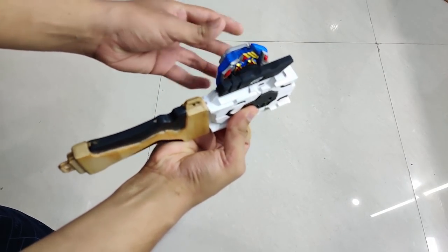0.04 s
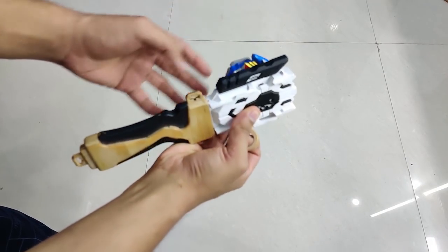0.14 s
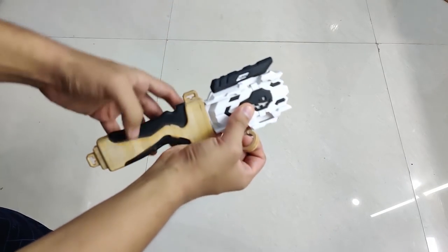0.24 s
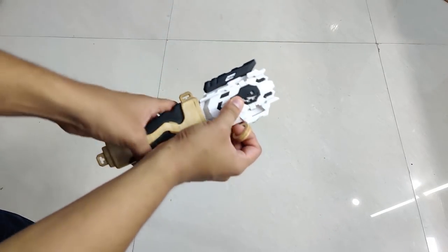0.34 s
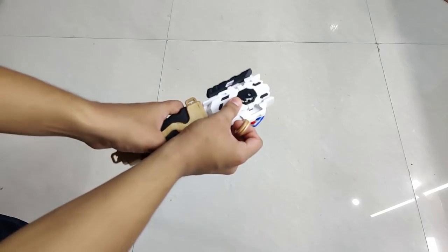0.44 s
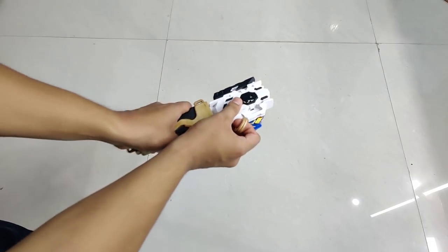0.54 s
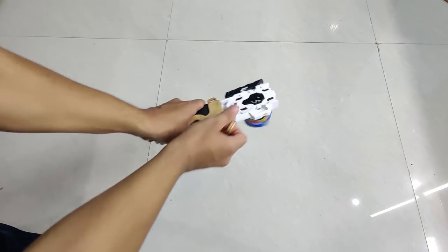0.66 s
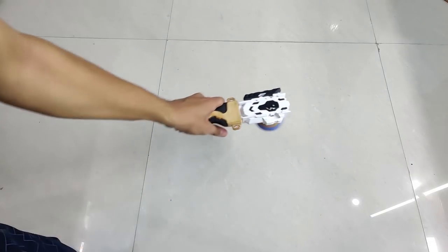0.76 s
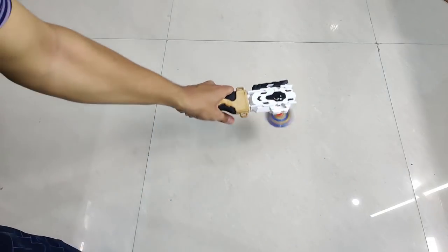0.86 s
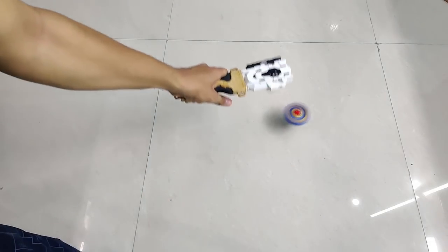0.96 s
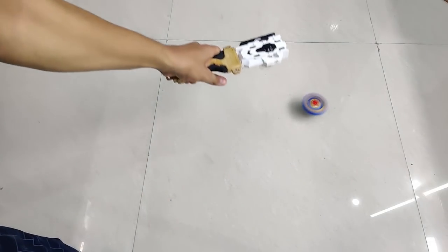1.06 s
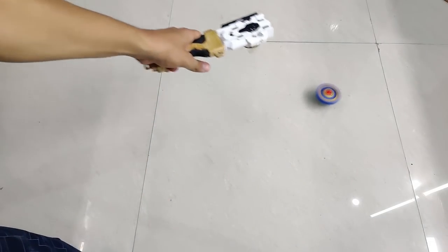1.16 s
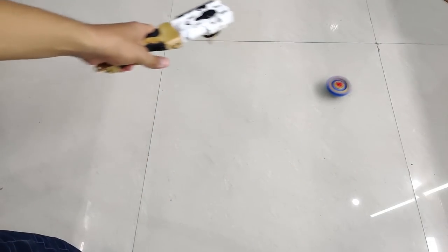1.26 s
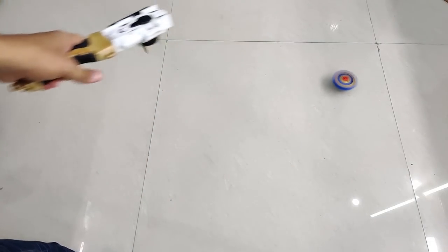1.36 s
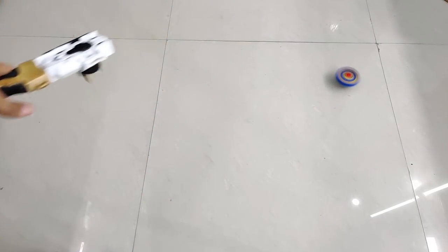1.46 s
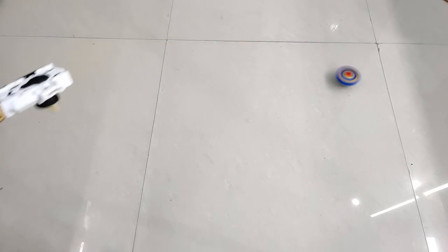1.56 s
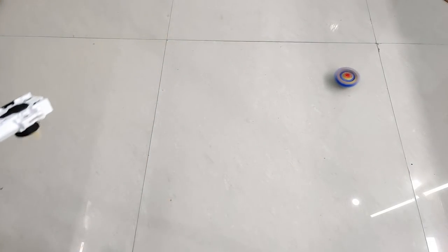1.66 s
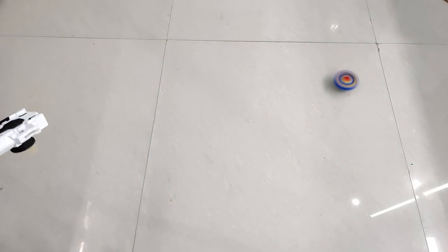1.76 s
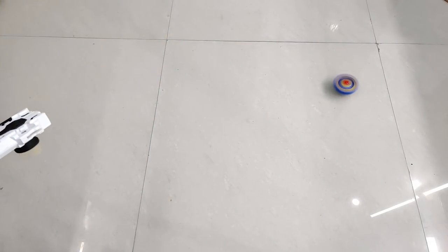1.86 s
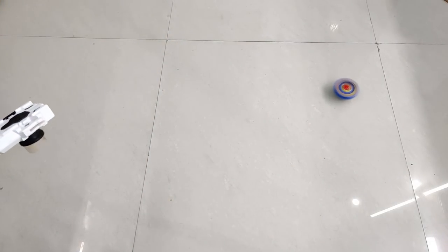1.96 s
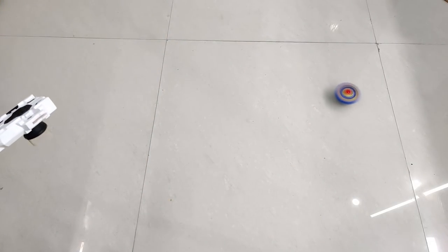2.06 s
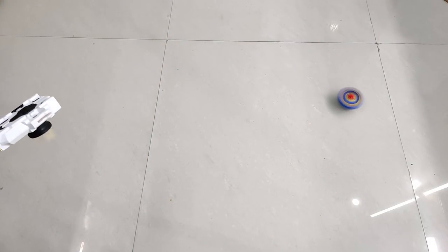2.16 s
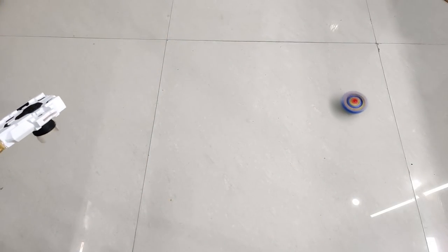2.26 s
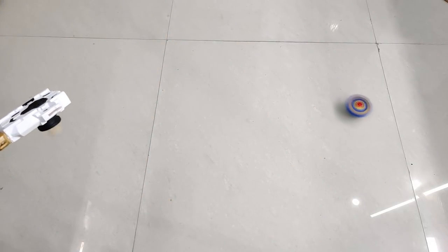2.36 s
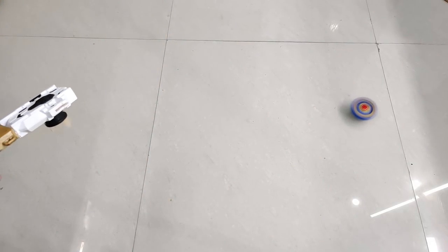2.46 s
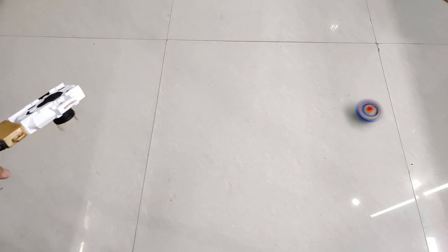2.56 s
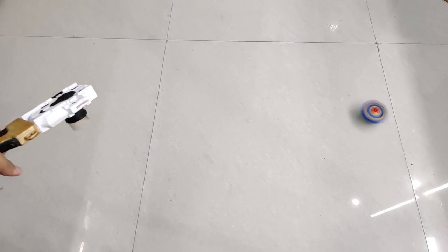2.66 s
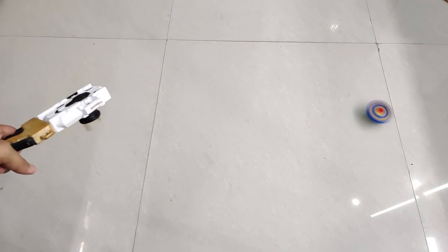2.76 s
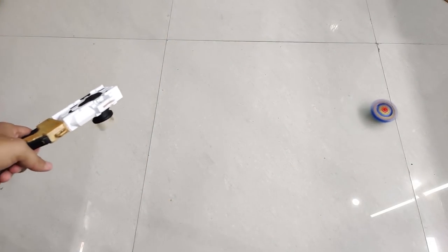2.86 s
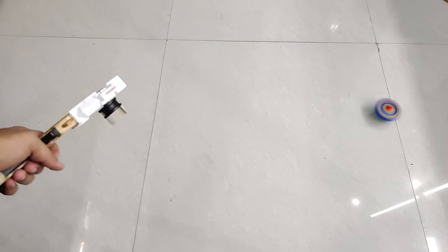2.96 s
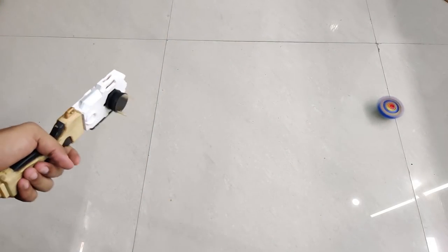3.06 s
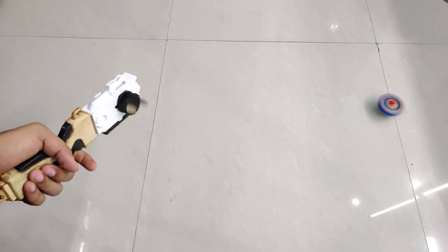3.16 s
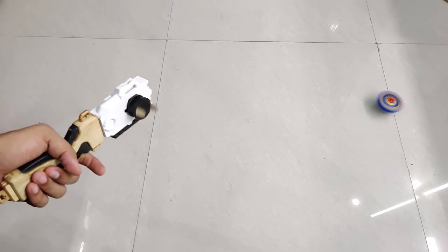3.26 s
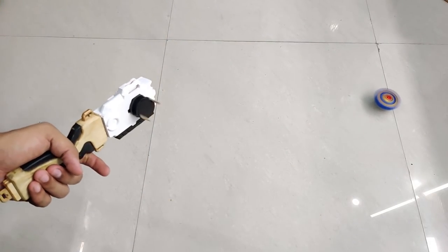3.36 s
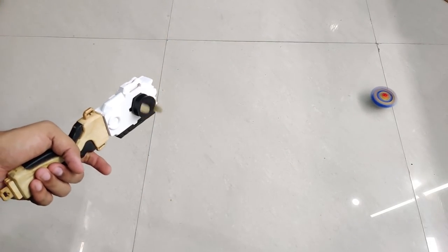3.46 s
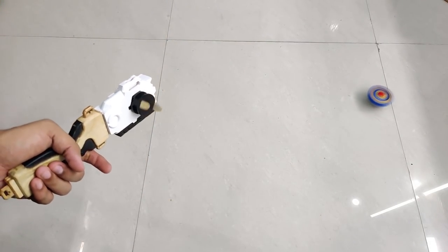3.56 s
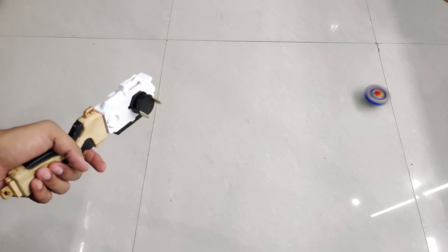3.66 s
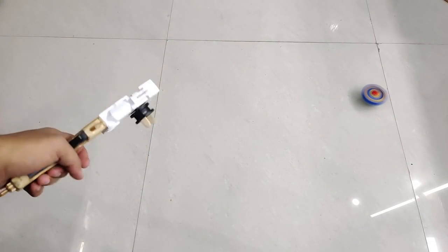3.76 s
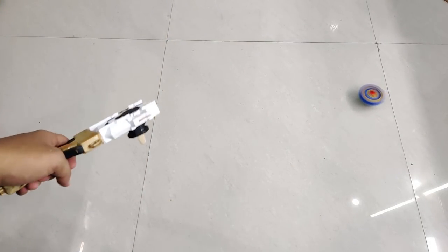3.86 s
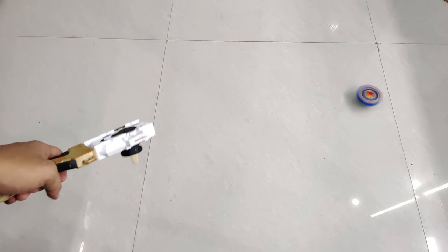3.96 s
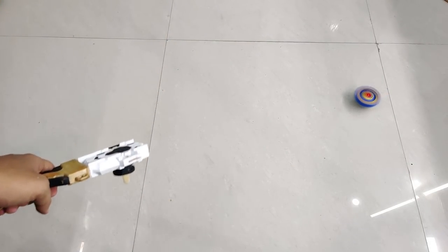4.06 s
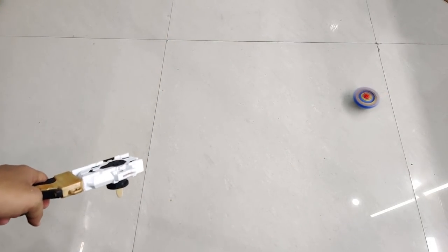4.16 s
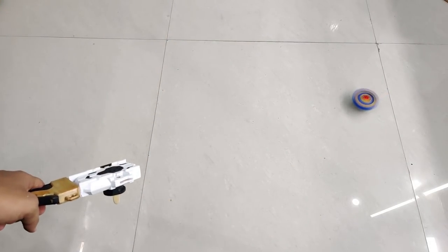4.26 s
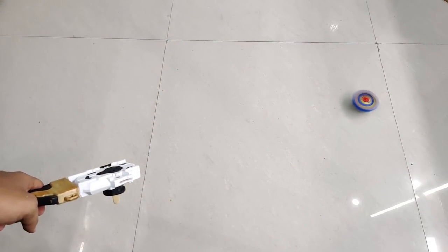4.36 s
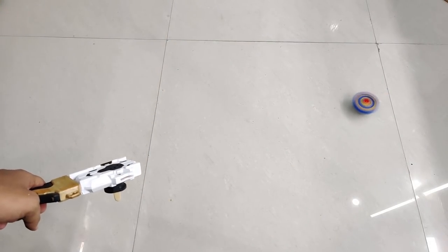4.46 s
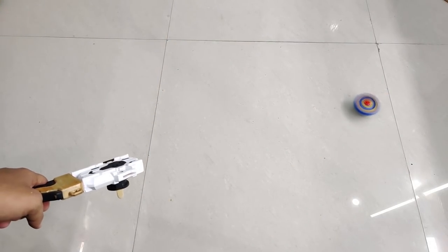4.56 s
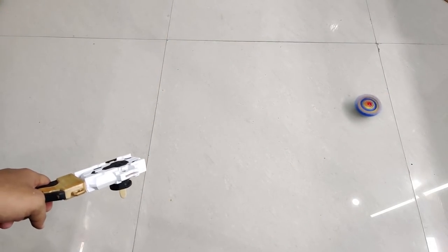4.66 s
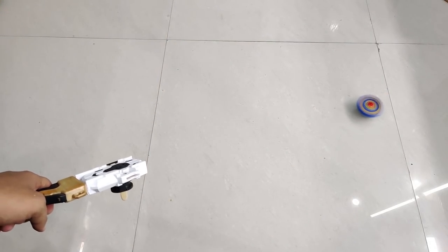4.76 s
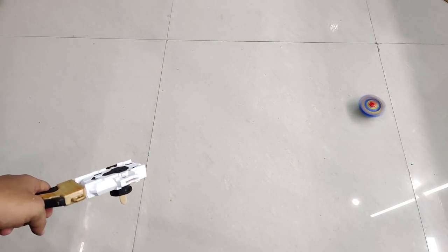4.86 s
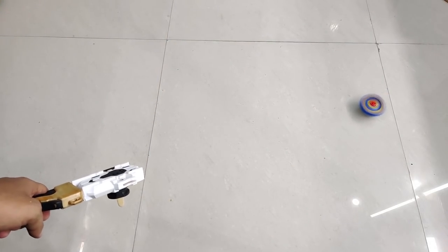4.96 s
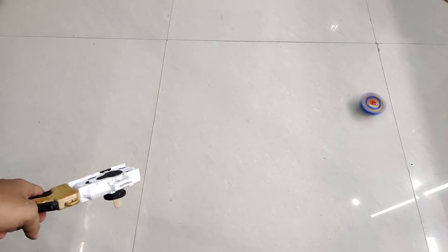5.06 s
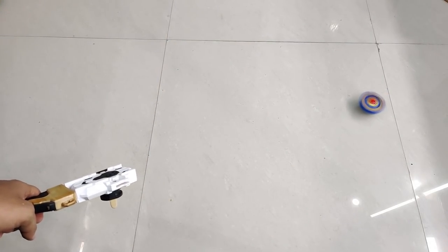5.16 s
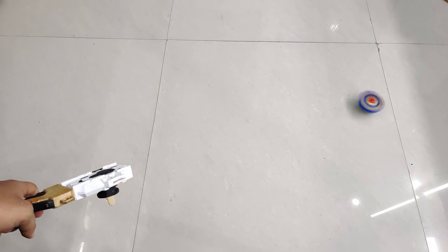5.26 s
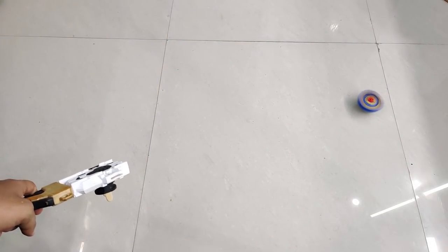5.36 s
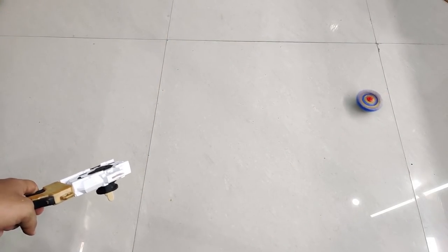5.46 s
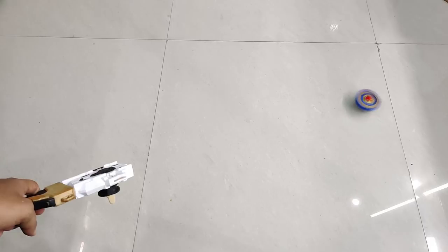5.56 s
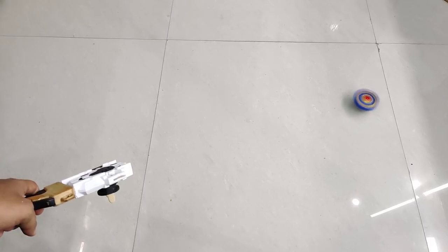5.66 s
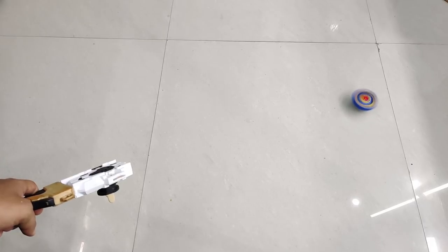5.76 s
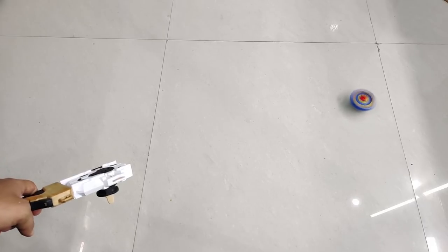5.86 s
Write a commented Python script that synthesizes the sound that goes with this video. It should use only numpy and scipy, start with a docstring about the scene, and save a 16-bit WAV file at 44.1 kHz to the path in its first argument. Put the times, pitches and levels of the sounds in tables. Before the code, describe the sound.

Over a low machine hum, a toothed ripping zip launches a spinning top that strikes hard tile, skips, scrapes brightly and quietens.

```python
"""A machine hums in a hard room; fingers rub and squeak on a hand launcher, then a toy top is ripped off it.
Toothed gears whirr ever faster, each tooth a snap of noise; the top cracks down on a tile floor, skips and whirrs.
Its tip scrapes the tile, hardest once a turn, and the friction noise excites the modes of its body.
The launcher gives tiny bright ticks, short bursts of noise, and a limiter ducks everything for a moment
at the landing."""
import sys
import numpy as np
from scipy import signal
from scipy.fft import rfft, irfft, next_fast_len
from scipy.io import wavfile
from scipy.ndimage import uniform_filter1d, minimum_filter1d, map_coordinates

SR = 44100
rng = np.random.default_rng(int(sys.argv[2]) if len(sys.argv) > 2 else 0)


def unload_wav(signal):
    """Save mono or channel-first audio to the path in sys.argv[1] as 16-bit WAV at rate SR, clipped to [-1, 1]."""
    wavfile.write(
        sys.argv[1],
        SR,
        np.round(np.clip(np.atleast_2d(signal).T, -1, 1) * 32767).astype(np.int16),
    )


N = 260631
T = np.arange(N) / SR  # time [s]


def amp(db):
    """Level to gain: 20 dB is a factor of ten in amplitude."""
    return 10 ** (np.asarray(db) / 20)


def unit(x):
    """Normalisation of x to an rms value of 1."""
    return x / np.sqrt(np.mean(x ** 2) + 1e-20)


def along(points, hz):
    """Interpolation of (frequency [Hz], value) points on a logarithmic frequency axis."""
    f, values = np.transpose(points)
    return np.interp(np.log(hz + 1), np.log(f + 1), values)


def curves(rows):
    """Piecewise linear interpolation in time: one curve for each column after the time."""
    seconds, *columns = np.transpose(rows)
    return [np.interp(T, seconds, column) for column in columns]


def wobble(rate):
    """Band-limited random fluctuation: a smooth curve through `rate` random knots a second."""
    knots = rng.standard_normal(int(N * rate / SR) + 4)
    return map_coordinates(knots, [T * rate])


def since(s):
    """Elapsed time [s] since s, 0 before."""
    return np.maximum(T - s, 0)


def gate(start, length, attack, release):
    """Trapezoidal envelope: rises from start, holds until start + length, then falls (all in s)."""
    rise = np.clip((T - start) / attack, 0, 1)
    fall = np.clip(1 - (T - start - length) / release, 0, 1)
    return rise * fall


def filtered(x, response):
    """Linear filtering as multiplication by a complex frequency response."""
    m = next_fast_len(N + SR // 2)
    return irfft(rfft(x, m) * response(np.fft.rfftfreq(m, 1 / SR)), m)[..., :N]


def coloured(x, spectrum):
    """Minimum-phase filtering: the folded cepstrum gives a causal kernel, scaled to energy 1."""
    size = 4096
    log_magnitude = np.log(amp(along(spectrum, np.fft.rfftfreq(size, 1 / SR))) + 1e-6)
    cepstrum = irfft(log_magnitude)
    cepstrum[1:size // 2] *= 2
    cepstrum[size // 2 + 1:] = 0
    kernel = irfft(np.exp(rfft(cepstrum)))
    return signal.fftconvolve(x, kernel / np.linalg.norm(kernel))[:len(x)]


def resonate(x, modes):
    """Modal superposition: parallel (frequency [Hz], width [Hz], gain [dB]) resonators of alternating sign."""
    def response(f):
        total = 0
        for k, (centre, width, db) in enumerate(modes):
            damping = 1j * f * width
            total = total + (-1) ** k * amp(db) * damping / (centre * centre - f * f + damping)
        return total
    return filtered(x, response)


def ringing(x, hz, width, db=0):
    """Resonance of one mode: two equal resonators in cascade give steep skirts; rms level db."""
    def response(f):
        damping = 1j * f * 1.5 * width  # widened, as the cascade narrows the peak
        return (damping / (hz * hz - f * f + damping)) ** 2
    return amp(db) * unit(filtered(x, response))


def burst(s, t60):
    """Impulsive excitation: noise of energy 1 that starts at s and decays exponentially by 60 dB in t60."""
    t = np.arange(SR // 20) / SR
    puff = rng.standard_normal(len(t)) * amp(-60 * t / t60)
    out = np.zeros(N + len(t))
    out[round(s * SR):][:len(t)] = puff / np.linalg.norm(puff)
    return out[:N]


def in_room(x, lead_ms, pan_db, wet_db):
    """Direct sound, with time and level differences between ears, plus a diffuse tail redrawn every 40 ms."""
    # reverberation time: (frequency [Hz], t60 [s])
    reverb_times = [(200, 0.21), (1500, 0.49), (5000, 0.68), (15000, 0.22)]
    hop, size = SR // 25, SR // 3
    hz, t, _ = signal.stft(np.zeros(size), SR, nperseg=256)
    build_up = 1 - np.exp(-t / 0.0029)
    decay = amp(-60 * t / along(reverb_times, hz)[:, None]) * build_up
    padded = np.pad(x, (hop, 2 * hop))
    fade = np.sin(np.pi * np.arange(2 * hop) / (2 * hop))
    wet = np.zeros((2, N + 2 * size))
    for start in range(0, N, hop):
        piece = padded[start:start + 2 * hop] * fade
        if np.abs(piece).max() > 1e-6:
            noise = signal.stft(rng.standard_normal((2, size)), nperseg=256)[2]
            tail = signal.istft(noise * decay, nperseg=256)[1]
            answer = signal.fftconvolve(piece[None], tail / np.linalg.norm(tail[0]), axes=1)
            wet[:, start:start + answer.shape[1]] += answer
    sides = np.array([[.5], [-.5]])  # left, right; a positive lead reaches the left first
    direct = filtered(x, lambda f: np.exp(2j * np.pi * f * sides * lead_ms / 1000))
    mixed = direct + amp(wet_db) * wet[:, hop:hop + N]
    return mixed * amp(sides * pan_db) / np.sqrt(1 + amp(2 * wet_db))


def room_tone():
    """Steady machine tones with slow phase wander, a rumble mostly coherent between ears, and diffuse air noise."""
    # weaker machine lines: (frequency [Hz], relative level [dB])
    motor_lines = [(48.4, -13), (57, -25), (96.9, -12.5), (145.3, -20.5)]
    # low machine noise: (frequency [Hz], relative spectral density [dB])
    rumble_spectrum = [(20, -18.5), (38, -13), (55, 4), (80, -2), (120, -11), (200, -10), (320, -11.5),
                       (600, -19.5), (1500, -47)]
    # faint hiss: (frequency [Hz], relative spectral density [dB])
    air_spectrum = [(240, -39), (400, -7), (777, -8.5), (1030, -14.5), (1230, -8.5), (1440, -18.5),
                    (1790, -16.5), (2050, -16), (3640, -14), (4440, -18.5), (5690, -23.5), (13900, -22.5),
                    (16000, -26.5)]
    # thin room tones: (frequency [Hz], width [Hz], relative gain [dB])
    thin_tones = [(1760, 45, -9), (3870, 45, 1), (4327, 120, -8)]
    # the hum swells for a while: (start [s], length [s], attack [s], release [s])
    hum_swell = (0.71, 2.34, 0.71, 0.71)
    hum_hz, slip_s = 199.5, 3.052

    def line(hz, phase):
        return np.sqrt(2) * np.sin(2 * np.pi * hz * T + phase)

    def noise(spectrum):
        return coloured(rng.standard_normal(N), spectrum)

    hum_db = -52.6 + 5 * gate(*hum_swell)
    slip = np.pi * np.clip((T - slip_s) / .012 + .5, 0, 1)  # the hum stumbles: half a cycle of phase in 12 ms
    hum = amp(0.1 * wobble(34)) * line(hum_hz, slip + 0.1 * wobble(2.5))
    motor = sum(amp(db - 1.5 + 1.2 * wobble(8.5)) * line(hz, 1.2 * wobble(9)) for hz, db in motor_lines)
    shared_rumble = amp(-8.5) * noise(rumble_spectrum)
    separate_rumble = amp(-19.5) * np.array([noise(rumble_spectrum), noise(rumble_spectrum)])
    machine = amp(hum_db) * (hum + motor + shared_rumble + separate_rumble)
    hiss = amp(-66.0) * np.array([noise(air_spectrum), noise(air_spectrum)])
    tones = amp(-71.5) * unit(resonate(rng.standard_normal((2, N)), thin_tones))
    return machine * amp([[1.8], [-2.2]]) + (hiss + tones) * amp([[1], [-1]])  # left, right


def fingers():
    """Sliding friction: skin makes fluctuating noise, louder as the grip tightens, and narrow-band squeaks."""
    # sliding skin: (frequency [Hz], relative spectral density [dB])
    skin_spectrum = [(180, -41.5), (300, 1), (398, -6), (537, 5.5), (1250, -3.5), (1430, -5.5),
                     (1580, -13.5), (2140, -12.5), (4750, -8.5), (5800, -30), (16000, -32)]
    # brushes and squeaks: (start [s], length [s], frequency [Hz], width [Hz], level [dB])
    rubs = [(0.427, .12, 7600, 6000, -66.5), (0.449, .1, 4420, 450, -69), (.6, .06, 4870, 60, -62.5),
            (.6, .08, 1440, 201, -65)]
    grip_start, grip_s = .41, .29
    start_db, tighten_db_per_s = -60.5, 21

    def friction():
        return amp(1.1 * wobble(45.0)) * rng.standard_normal(N)

    grip_db = start_db + tighten_db_per_s * np.minimum(since(grip_start), grip_s)
    sliding = gate(grip_start, grip_s, attack=0.0404, release=.06)
    slide = sliding * amp(grip_db) * coloured(friction(), skin_spectrum)
    squeaks = np.zeros(N)
    for s, length, *mode in rubs:
        squeaks += gate(s, length, attack=0.027, release=.04) * ringing(friction(), *mode)
    return in_room(slide + squeaks, lead_ms=0, pan_db=6.5, wet_db=3.5)


def ticks():
    """Impulsive excitation: the launcher's plastic gives tiny bright ticks as the hand turns it."""
    # distinct ticks: (time [s], relative level [dB])
    clear = [(3.19, -38), (3.2359, -40), (3.261, -36), (3.2748, -43), (3.3232, -34), (3.4369, -43),
             (3.4619, -47), (3.5206, -41), (3.6383, -52), (5.2974, -62.5)]
    # tick colour: (frequency [Hz], relative spectral density [dB])
    tick_spectrum = [(3000, -24), (10000, -25), (13000, -7.5), (15500, -1), (16500, -43)]
    creak_start, creak_s = 3.17, .48
    creak_db, fade_db_per_s = -44, 17  # relative level, as in the distinct ticks
    faint = []
    for age, weak in rng.random(size=(22, 2)) * [creak_s, 1]:
        faint.append((creak_start + age, creak_db - fade_db_per_s * age - 6 * weak))
    snaps = sum(amp(db + 15.0) * burst(s, t60=0.0076) for s, db in clear + faint)
    return in_room(coloured(snaps, tick_spectrum), lead_ms=0, pan_db=8, wet_db=-2.5)


def launcher():
    """Periodic impact: the cord drives gears whose tooth snaps excite spool, shell and grip; then it winds back."""
    # mean speed of the pull: (time [s], tooth rate [teeth/s])
    tooth_rates = [(.695, 39.5), (.725, 135), (.792, 520), (.88, 790), (.98, 820)]
    # gear rattle: (frequency [Hz], relative spectral density [dB])
    gear_spectrum = [(150, -23.5), (250, -13), (486, -6.5), (588, -15.5), (807, -7), (1260, -14.5),
                     (1730, -4), (2330, -2), (2520, -6), (2960, -2.5), (3350, -3), (4320, -1.5),
                     (7640, -2.5), (9240, -6.5), (11000, -13), (14300, -53.5), (22000, -120)]
    # bright tooth noise: (frequency [Hz], relative spectral density [dB])
    hiss_spectrum = [(7000, -44.5), (9500, -11.5), (12000, -4), (14000, 0.5), (15800, 2), (16500, -59)]
    # the gears catch during the pull: (time [s], relative level [dB])
    jolts = [(0.7277, -53), (.7465, -43), (0.8892, -24.5), (0.9076, -31)]
    # modes of the shell: (frequency [Hz], width [Hz], relative gain [dB])
    casing_modes = [(5220, 330, 9.5), (8000, 1200, 3)]
    # the cord's spool: (frequency [Hz], width [Hz])
    spool_mode = (1720, 710)
    # the hollow grip, stirred as the tooth rate nears its pitch: (frequency [Hz], width [Hz])
    cavity_mode = (813, 110)
    release_s = 0.95  # the top leaves the launcher
    rewind_s, rewind_db, rewind_fade_db_per_s = .58, -37, 7

    rate, = curves(tooth_rates)
    teeth = np.cumsum(rate * amp(.5 * wobble(150))) / SR
    judder = amp(1.94 * wobble(110))

    def driven(db, power):
        """Gain that grows with a power of the speed, db at full speed."""
        return amp(db) * (rate / rate.max()) ** power

    def snaps():
        """Noise that decays anew after each tooth."""
        decay = np.exp(-(teeth % 1) * 2)
        return unit(decay * judder * amp(0.81 * wobble(500)) * rng.standard_normal(N))

    catches = sum(amp(db + 27) * burst(s, t60=.016) for s, db in jolts)
    rattle = coloured(driven(db=-24.5, power=1.67) * snaps() + catches, gear_spectrum)
    hiss = driven(db=-20.5, power=2.9) * coloured(snaps(), hiss_spectrum)
    shell_onset = np.clip(rate / 450, 0, 1) ** 2
    shell = driven(db=-33.5, power=0.84) * shell_onset * unit(resonate(snaps(), casing_modes))
    spool = driven(db=-42, power=.35) * ringing(snaps(), *spool_mode)
    mesh = driven(db=-47.5, power=2.1) * amp(5.0 * wobble(130)) * np.sin(2 * np.pi * teeth)
    cavity = driven(db=-37, power=8) * ringing(snaps(), *cavity_mode)
    start = tooth_rates[0][0]
    pulling = gate(start, release_s - start, attack=.02, release=.008)
    draught_spectrum = [(20, 3), (70, -10), (130, -12.5), (400, -46), (2000, -90.5)]  # (frequency [Hz], [dB])
    draught = driven(db=-44, power=1.94) * coloured(rng.standard_normal(N), draught_spectrum)
    rewind_level = amp(rewind_db - rewind_fade_db_per_s * since(release_s))
    winding = gate(release_s, rewind_s, attack=.03, release=.06) * rewind_level
    rewind = coloured(snaps(), hiss_spectrum) + amp(-3.0) * unit(resonate(snaps(), casing_modes))
    gears = pulling * (rattle + hiss + shell + spool + mesh + cavity) + winding * rewind
    return in_room(gears, lead_ms=.12, pan_db=4.0, wet_db=4.5) + pulling * draught


def landing():
    """Impact excitation: each blow, in the launcher or on the floor, is a short crack that rings the top's shell."""
    # a knock in the launcher, then floor strikes: (time [s], relative level [dB], tilt [dB/decade about 1500 Hz])
    blows = [(.326, -61, -15), (.986, -7.5, 0), (0.987, -6, -4.5), (1.0785, -21, -6.5), (1.1082, -13, 8),
             (1.112, -18.5, 2.5), (1.171, -18.5, 10.5)]
    # crack before its tilt: (frequency [Hz], relative spectral density [dB])
    strike_spectrum = [(200, -13.5), (800, -8.5), (1600, 3.5), (2400, -7.5), (5000, 1), (15800, -11),
                       (16500, -32)]
    # modes of the struck shell: (frequency [Hz], width [Hz], relative gain [dB])
    shell_modes = [(1390, 83, -3), (1794, 77, 7), (2394, 180, -2.5)]
    cracks = np.zeros(N)
    for s, db, bright_db in blows:
        tilted = [(hz, level + bright_db * np.log10(hz / 1500)) for hz, level in strike_spectrum]
        cracks += amp(db + 22.5) * coloured(burst(s, t60=0.0095), tilted)
    ring = amp(-0.5) * resonate(cracks, shell_modes)
    return in_room(cracks + ring, lead_ms=-0.034, pan_db=-1.5, wet_db=-1.0)


def leaning():
    """Stronger contact during a lean: extra dB of scrape and three modes, relaxing as the top rights itself."""
    # (start [s], length [s], initial extra level [dB] of scrape, low mode, main mode, upper mode)
    leans = [(1.69, 0.35, 3, 5.6, 19, 9.5), (2.78, 0.62, 0, 6.8, 11, -1.5),
             (3.338, 0.074, -1.5, 7.2, 1.8, -1), (4.5, .69, 1.5, 2, 1.48, 2), (5.48, .45, 1, 8.4, 2, 5)]
    attack_s, release_s, righting_s = 0.059, 0.13, 0.86  # righting_s is a time constant
    total = 0
    for s, length, *extra_db in leans:
        course = gate(s, length, attack_s, release_s) * np.exp(-since(s) / righting_s)
        total = total + np.outer(extra_db, course)
    return total


def top():
    """Friction-driven resonance: the tip grinds over grit, hardest once a turn, while it skids, skates and settles."""
    # mean spin: (time [s], spin [turns/s])
    spin_rates = [(1, 88.3), (1.9, 79.7), (4.2, 56), (5.9, 46)]
    # low, main and upper modes: (frequency [Hz], width [Hz], relative level [dB])
    body_modes = [(1010, 220, -2), (1540, 172, -0.5), (1915, 267, 0.5)]
    # overtone that follows the main mode: (frequency [Hz], width [Hz], relative level [dB])
    overtone = (3930, 450, -15)
    # tip noise: (frequency [Hz], relative spectral density [dB])
    scrape_spectrum = [(1350, -26), (2300, 0.5), (3140, 2.5), (3480, -2.5), (3940, 0.5), (4440, -0.5),
                       (6050, -5.5), (6580, -6.5), (10000, -20.5), (12000, -10), (15600, -55),
                       (22000, -120)]
    # the floor's own answer: (frequency [Hz], relative spectral density [dB])
    tile_spectrum = [(150, -15), (350, -5), (750, 0.5), (1350, 1.5), (1800, 0), (2600, -43)]
    # brightest tip noise: (frequency [Hz], relative spectral density [dB])
    sizzle_spectrum = [(5500, -23), (7500, -13), (10000, -8.5), (12500, -7), (14000, 0.5), (15800, 2.5),
                       (16500, -48.5)]
    # part levels before the spin's drive: (extra in the skid [dB], skating [dB], settled [dB])
    contact = {"scrape": (18.3, -42, -64.5), "tile": (19, -52, -67), "sizzle": (22.3, -44.5, -64),
               "low": (12, -57.5, -63.5), "main": (13, -54.5, -58), "upper": (17.7, -48, -70)}
    landing_s = 0.98
    skid_s, skid_curve = 0.72, 1.65  # the tip skids until it grips; the exponent shapes how the skid eases off
    settle_start, settle_s = 2.915, 0.85  # the top comes to stand on one spot
    spin_power = 2.04  # the noise amplitude grows with this power of the spin
    nod_rate, nod_db = 8, 1.4  # the axis nods [times/s] and the ring pulses with it

    spin, = curves(spin_rates)
    skid = np.clip(1 - since(landing_s) / skid_s, 0, 1) ** skid_curve
    settled = np.clip(since(settle_start) / settle_s, 0, 1)
    level = {}
    for part, (skid_db, skating_db, settled_db) in contact.items():
        level[part] = skid_db * skid + skating_db * (1 - settled) + settled_db * settled
    scrape_lean, *mode_leans = leaning()
    nod = nod_db * np.sin(2 * np.pi * nod_rate * T + 1.2 * wobble(4))
    mode_db = [level[part] + lean + nod + .9 * wobble(14)
               for part, lean in zip(["low", "main", "upper"], mode_leans)]
    turns = np.cumsum(spin * amp(0.6 * wobble(24.79))) / SR
    pressure_db = 3 * np.cos(2 * np.pi * turns) + 1.84 * wobble(250) + 0.47 * wobble(22.067)

    def grit(depth):
        """Noise whose level follows the tip's pressure, scaled by depth."""
        return unit(amp(depth * pressure_db) * rng.standard_normal(N))

    modes = zip([*mode_db, mode_db[1]], [*body_modes, overtone])
    body = sum(amp(db) * ringing(grit(depth=0.9), *mode) for db, mode in modes)
    scrape = amp(level["scrape"] + scrape_lean) * coloured(grit(depth=1.11), scrape_spectrum)
    tile = amp(level["tile"] + scrape_lean) * coloured(grit(depth=0.98), tile_spectrum)
    sizzle = amp(level["sizzle"]) * coloured(grit(depth=0.72), sizzle_spectrum)
    touchdown = np.clip(since(landing_s) / 0.0056, 0, 1)
    drive = touchdown * (spin / spin.max()) ** spin_power
    return in_room(drive * (body + scrape + tile + sizzle), lead_ms=-0.236, pan_db=3.5, wet_db=4)


def scene():
    """Superposition of the room tone, grip, ticks, launch, landing and spin."""
    return room_tone() + fingers() + ticks() + launcher() + landing() + top()


def limiter(x, ceiling_db):
    """Look-ahead gain control: the gain drops just ahead of a loud blow, holds, and returns at once."""
    power = uniform_filter1d(np.mean(x ** 2, axis=0), size=128)
    level = np.sqrt(np.abs(power) + 1e-12)
    hold, ahead = round(.095 * SR), round(.007 * SR)
    needed = np.minimum(1, amp(ceiling_db) / level)
    gain = minimum_filter1d(needed, hold, origin=hold // 2 - ahead - 1)
    return x * uniform_filter1d(gain, size=64)


def record(dry):
    """Dynamic limiting, then band limiting by a sharp low-pass."""
    top_hz = 15950
    return filtered(limiter(dry, ceiling_db=-15.5), lambda hz: hz < top_hz)


dry = scene()
out = record(dry)
unload_wav(out)
```